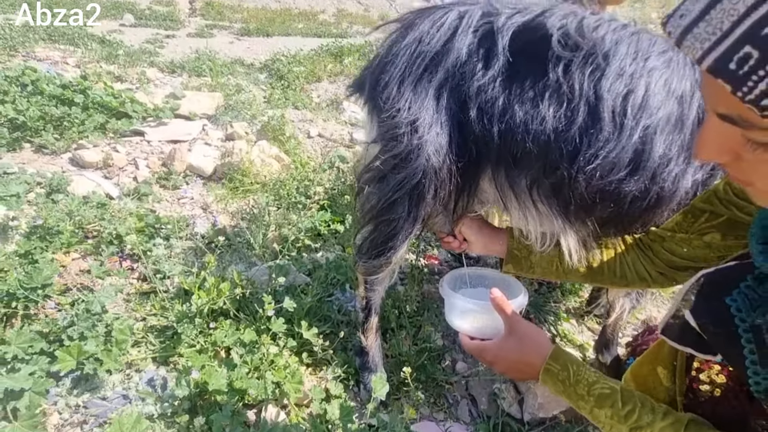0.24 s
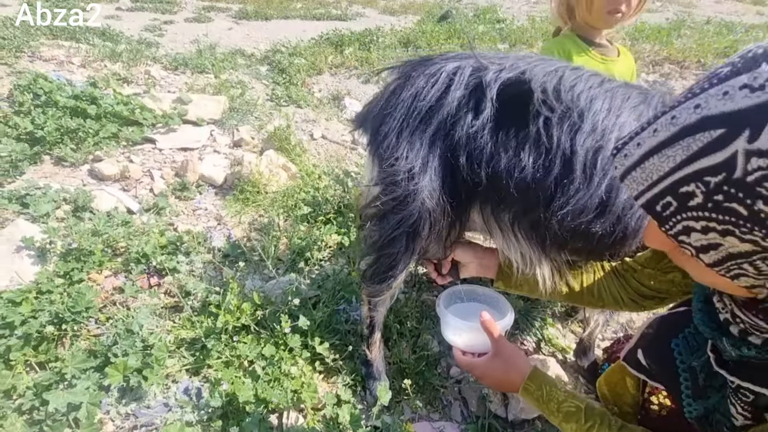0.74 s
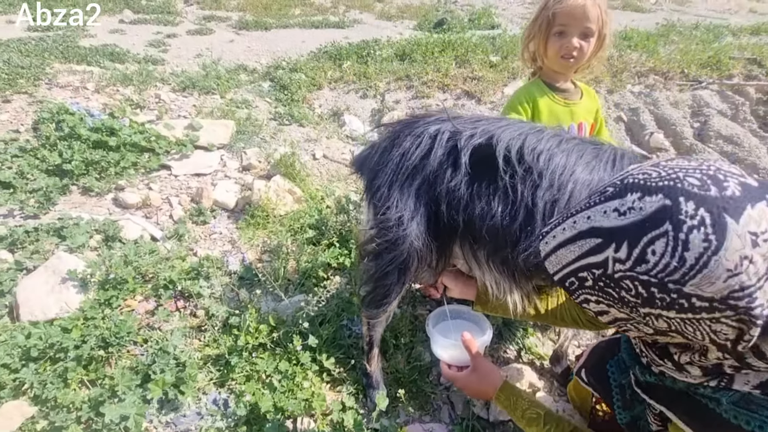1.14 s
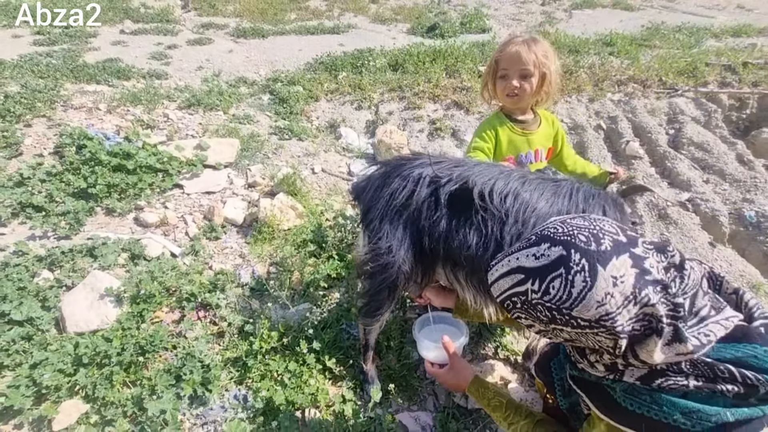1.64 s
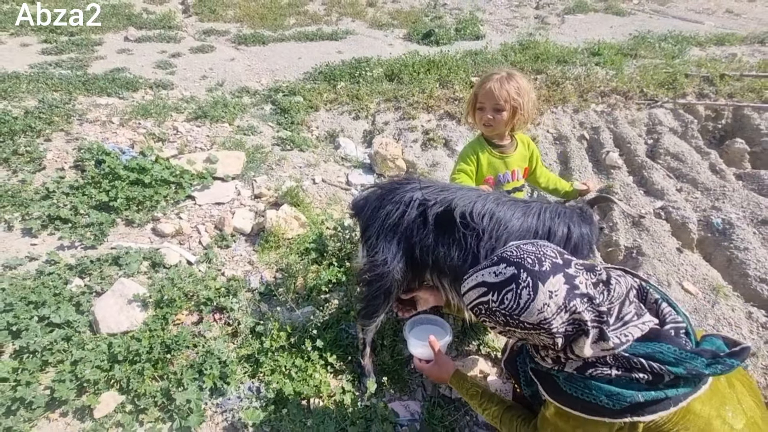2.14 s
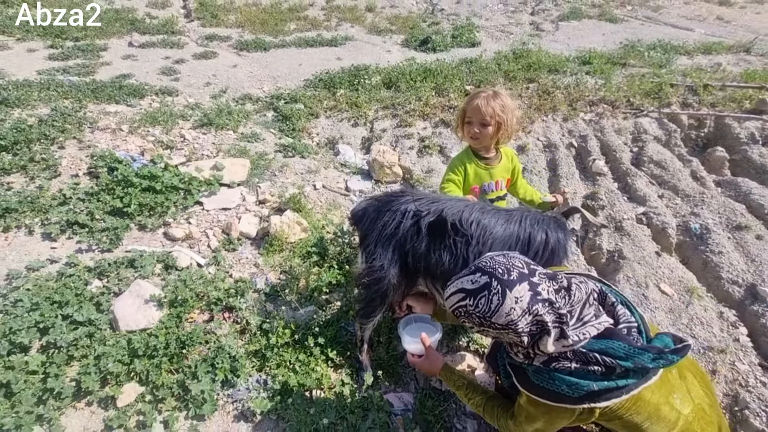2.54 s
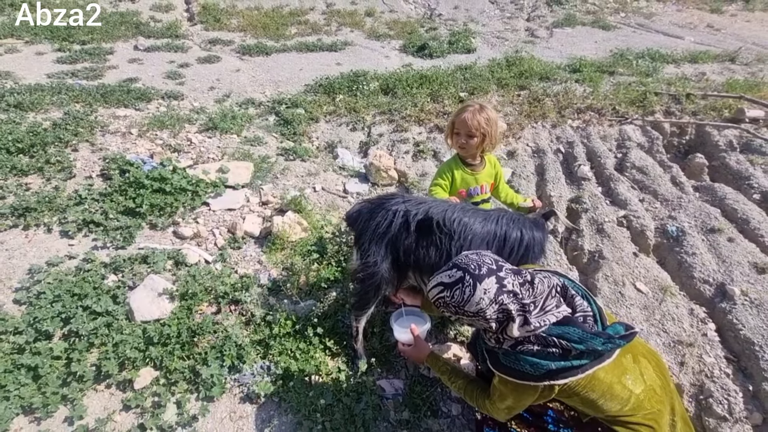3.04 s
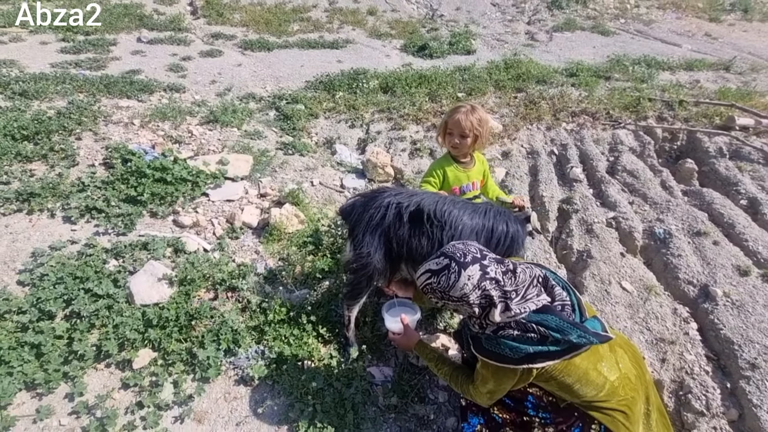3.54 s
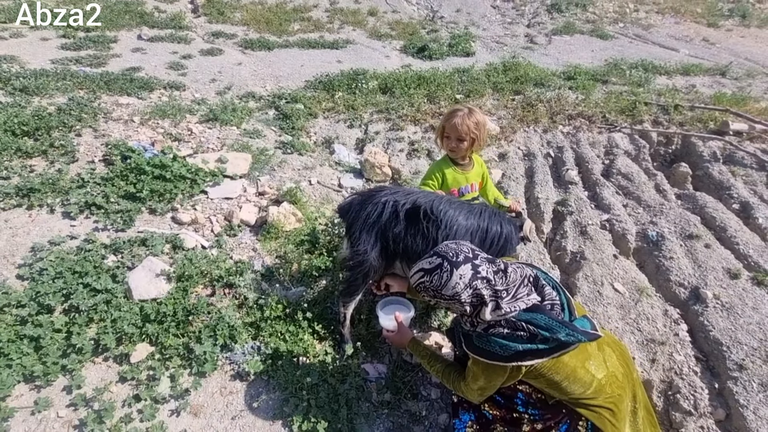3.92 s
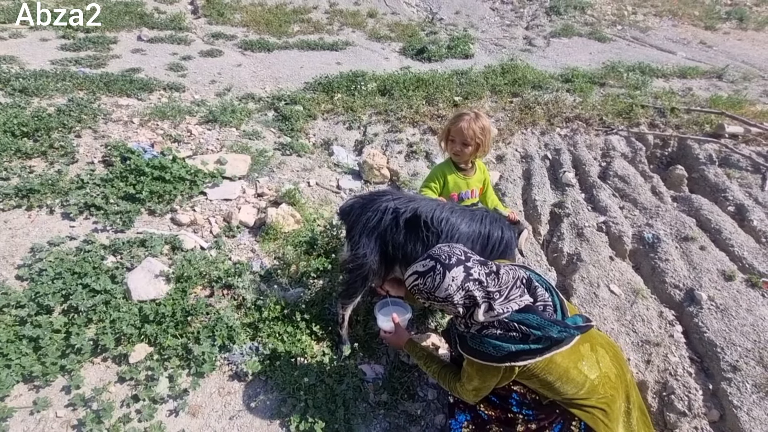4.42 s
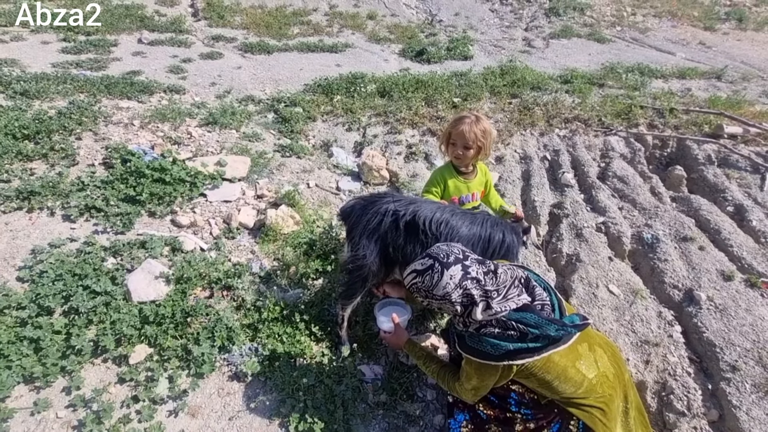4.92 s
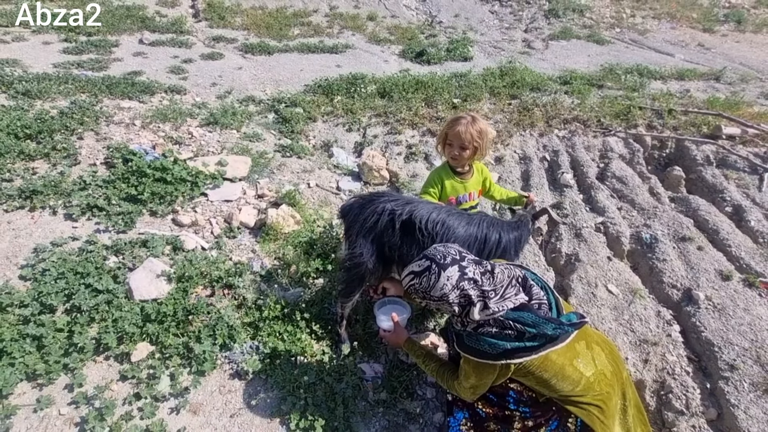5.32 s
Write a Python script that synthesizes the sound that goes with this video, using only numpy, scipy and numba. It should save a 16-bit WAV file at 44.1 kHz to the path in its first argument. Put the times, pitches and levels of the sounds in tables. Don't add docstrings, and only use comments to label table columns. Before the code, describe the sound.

Hand-milking in an open field: bright, grainy sprays of milk into a plastic bowl, low wind thumps, sparse bird chirps, a faint engine drone.

```python
import sys
import numpy as np
from scipy import signal
from scipy.fft import rfft, irfft
from scipy.io import wavfile
from numba import njit

SR = 44100
rng = np.random.default_rng(int(sys.argv[2]) if len(sys.argv) > 2 else 0)


def undo_db(level):
    steps = np.asarray(level, float) / 20
    return 10 ** steps


def transcribe(signal):
    frames = np.atleast_2d(signal).T
    limited = np.clip(frames, -1, 1)
    pcm = np.round(limited * 32767).astype(np.int16)
    wavfile.write(sys.argv[1], SR, pcm)


N = 245637
T = np.arange(N) / SR
EARS = np.array([[1], [-1]])


def rms_one(x):
    return x / np.sqrt(np.mean(x ** 2) + 1e-20)


def in_time(rows):
    s, *columns = np.transpose(rows)
    return [np.interp(T, s, c) for c in columns]


def colour(x, points):
    hz, db = np.transpose(points)
    f = np.maximum(np.fft.rfftfreq(N, 1 / SR), 1)
    gain = undo_db(np.interp(np.log(f), np.log(hz), db))
    return irfft(rfft(x) * gain, N)


def drift(rate_hz):
    r = np.exp(-2 * np.pi * rate_hz / SR)
    noise = rng.standard_normal(N + SR)
    return rms_one(signal.lfilter([1], [1, -2 * r, r * r], noise)[SR:])


@njit
def swept(x, twice_r_cos, r2):
    y = np.zeros_like(x)
    for c in range(x.shape[0]):
        for i in range(2, x.shape[1]):
            y[c, i] = x[c, i] - x[c, i - 2] + twice_r_cos[i] * y[c, i - 1] - r2 * y[c, i - 2]
    return y


def resonate(x, hz, width_hz):
    r = np.exp(-np.pi * width_hz * 1.5 / SR)
    k = 2 * r * np.cos(2 * np.pi * np.minimum(hz + 0 * T, 17000) / SR)
    return rms_one(swept(swept(x, k, r * r), k, r * r))


def notch(x, hz, width_hz, depth):
    r = np.exp(-np.pi * width_hz / SR)
    ring = swept(x, 2 * r * np.cos(2 * np.pi * (hz + 0 * T) / SR), r * r)
    return x - np.clip(depth, 0, 1) * (1 - r * r) / 2 * ring


def band_noise(noise, order, low_hz, high_hz):
    return signal.sosfilt(signal.butter(order, [low_hz, high_hz], "band", fs=SR, output="sos"), noise)


def add(out, s, burst):
    i = max(int(s * SR), 0)
    out[..., i:i + burst.shape[-1]] += burst[..., :N - i]


def motor():
    # pitch in Hz, level in dB
    lines = [(85, -57), (168, -68), (251, -82.5)]
    turns = np.cumsum(1 + 0.00617 * drift(0.73)) / SR
    return sum(undo_db(db + 3.5 + 2.8 * drift(3.6)) * np.sin(2 * np.pi * hz * turns) for hz, db in lines)


def field():
    # pitch in Hz, level in dB per Hz
    hiss = [(300, 2.5), (600, -9.5), (1000, -10), (1600, -9), (2400, -13), (3300, -10.5), (5000, -12.5),
            (5900, -12), (7600, -12.5), (9400, -21.5), (11500, -14), (13500, -6.5), (15000, -10.5),
            (16000, -4.5)]
    # pitch in Hz, left minus right in dB
    balance = [(400, -1), (5000, 10), (6800, -7.5), (8500, -19), (9600, -7), (15000, -5.5)]
    left, right = rms_one(colour(rng.standard_normal((2, N)), hiss))
    tilt = np.array(balance)
    both = np.array([colour(left, tilt * [1, .5]), colour(right, tilt * [1, -.5])])
    return both * undo_db(-67.5 + 2.3 * drift(54))


def eddies():
    # crest in seconds, peak in dB, pitch in Hz, grit in dB against the push
    puffs = [(2.26, -23, 75.5, -30), (0.393, -17, 118, -19), (0.603, -26.5, 88, -29),
             (0.722, -19.5, 104, -20), (0.864, -17.5, 79, -23), (1.027, -20.5, 86, -24),
             (1.242, -20.5, 82, -35), (1.4, -16.5, 99, -21), (1.489, -23, 122, -2.5),
             (1.532, -8, 81.4, -23), (4.551, -33, 67.4, -40), (1.636, -15, 123, -18.5),
             (1.807, -6, 70.6, -16.5), (1.853, -13.5, 81.6, -14), (2.003, -15.5, 100, -34),
             (3.013, -11.5, 89, -9), (3.09, -16, 76.5, -26.5), (4.103, -21, 78, -34), (3.41, -12, 101, -14),
             (3.569, -17, 87.5, -19), (3.657, -20, 72, -52), (3.761, -17, 103, -28),
             (3.839, -24.5, 87.3, -20.5), (4.022, -15.5, 98, -31), (4.174, -16.5, 79, -43),
             (4.808, -13, 90, -24.5), (5.264, -23, 60, -17), (5.435, -17, 53.7, -27.5),
             (5.492, -18, 73, -45), (5.528, -17.5, 98.5, -23)]
    # onset in seconds, peak in dB, pitch in Hz, grit in dB against the push
    lesser = [(0.029, -42, 80, -35), (0.073, -40, 80, -32), (0.118, -35, 80, -28),
              (0.162, -30.5, 76.5, -28), (0.191, -32, 80, -37), (0.221, -44, 79.4, -34),
              (0.526, -31, 83, -11), (0.558, -36, 83, -26), (0.597, -44, 82, -30), (0.648, -57, 80.4, -36),
              (0.696, -28, 88, -31), (0.963, -26, 85, -21.5), (1.087, -27.5, 77, -36),
              (1.169, -25, 75, -45), (2.046, -25, 80, -33.5), (2.216, -28, 80.5, -44),
              (2.655, -24, 85.5, -19), (2.771, -31, 85, -20), (3.05, -22, 85, -12.5),
              (3.151, -27.5, 77, -39), (3.206, -26, 78, -25), (3.384, -14.5, 82.4, -24.5),
              (3.72, -26, 81, -34), (3.789, -38, 80.6, -14), (3.928, -27, 80, -29), (4.048, -26.5, 83, -33),
              (4.248, -33, 82, -21), (4.515, -30.5, 76, -32), (4.67, -31, 76, -44), (5.163, -26.5, 75, -30)]
    veers = [.95, .98, 2.5, 2.75, 2.9, 3.3, 3.5, 4.13, 4.3]
    lag_s, lesser_db = 0.012, 3.5
    out, t = np.zeros((2, N)), np.arange(-SR // 20, SR // 10) / SR
    grit = rms_one(band_noise(rng.standard_normal(N + SR), 2, 110, 210))
    every = [*puffs, *[(s + lag_s, db + lesser_db, hz, grit_db) for s, db, hz, grit_db in lesser]]
    for (s, db, hz, grit_db), turn in zip(every, rng.random(99)):
        cycles = hz * t
        swell = np.exp(-(cycles / np.where(t < 0, .7, 1.1)) ** 2)
        front = np.exp(-((t + 0.0045) / 0.02) ** 2) * grit[int(s * SR):][:len(t)]
        push = swell * np.sin(2 * np.pi * (cycles - 0.18 * cycles * np.abs(cycles) + turn))
        port = 1 - np.searchsorted(veers, s) % 2
        add(out[port], s + t[0], undo_db(db) * (push + undo_db(grit_db - 3.0) * front))
    return out


def wind():
    # time in seconds, wind strength in dB, lean (left minus right) in dB
    breeze = [(0, -32.5, 3.5), (.25, -41, -6.5), (.7, -33.5, -6.5), (1.15, -41.5, -14.5), (1.45, -27, -6),
              (1.65, -34.5, 0), (1.9, -31.5, -9.5), (2.3, -39.5, -8.5), (2.55, -45.5, 12.5),
              (2.8, -35.5, -1), (3.2, -42.5, 5), (3.5, -28.5, -0.5), (3.8, -32.5, 15.5), (4.18, -40.5, 4),
              (4.4, -51, 3), (4.64, -43.5, 7), (4.9, -58.5, 14), (5.4, -37.5, 20)]
    # pitch in Hz, level in dB per Hz
    rumble_colour = [(12, -35), (20, 20), (45, 6.5), (73, 7), (91, 5.5), (198, -14), (398, -41), (552, -52),
                     (700, -59), (910, -94), (1540, -120)]
    strength_db, lean_db = in_time(breeze)
    level_db = strength_db + lean_db * EARS / 2
    lumps = undo_db(12.9 * np.minimum([drift(16.8), drift(10.1)], 0.7))
    rumble = rms_one(colour(rng.standard_normal((2, N)) * lumps, rumble_colour))
    both = eddies() + rumble * undo_db(level_db + 4.0)
    return signal.sosfilt(signal.butter(6, 40, "high", fs=SR, output="sos"), both)


def other_birds():
    # start in seconds, length in seconds, start pitch in Hz, end pitch in Hz, level in dB
    strays = [(0.561, 0.017, 2670, 2570, -67), (0.579, .012, 2550, 2550, -69),
              (2.206, .047, 3500, 2730, -69.5), (2.272, 0.013, 6500, 7700, -91),
              (2.288, 0.031, 7800, 6940, -80.5), (2.347, 0.0052, 3020, 3460, -70),
              (2.392, 0.0082, 3020, 3330, -63.5), (2.392, 0.0065, 5340, 3800, -69),
              (2.4, 0.01, 3400, 5400, -66), (3.878, 0.03, 6850, 6830, -84), (3.942, .012, 8000, 7400, -78),
              (4.055, 0.014, 6750, 6640, -80), (5.17, 0.012, 7500, 6700, -79),
              (5.268, 0.005, 3500, 5030, -78), (5.343, 0.029, 3260, 2930, -68.5),
              (5.407, .009, 3050, 2910, -66), (5.421, 0.024, 2550, 2350, -73)]
    # start in seconds, slide length in seconds, top pitch in Hz, level in dB
    falls = [
        (5.06, .016, 3370, -75.5),
        (5.18, .02, 3220, -72),
    ]
    rest_hz, rest_s, rest_db = 2810, 0.021, 4.5
    slides = [(s, length, hz, rest_hz, db) for s, length, hz, db in falls]
    rests = [(s + 0.83 * length, rest_s, rest_hz, .96 * rest_hz, db + rest_db) for s, length, hz, db in falls]
    return slides + rests + strays


def whistle(length, start_hz, end_hz, db):
    u = np.linspace(0, 1, int(length * SR) + 8)
    cycles = np.cumsum(start_hz + (end_hz - start_hz) * u) / SR
    return undo_db(db + 15.5) * np.sin(np.pi * u) ** 0.43 * np.sin(2 * np.pi * cycles)


def birds():
    # start in seconds, length in seconds, start pitch in Hz, end pitch in Hz, level in dB
    songs = [(0.433, 0.022, 4830, 5330, -67), (0.452, 0.026, 3960, 4580, -57),
             (.476, .009, 4280, 3800, -56), (.4885, .004, 5300, 4600, -61), (.494, 0.0057, 4200, 3770, -53),
             (.499, 0.0094, 3820, 3450, -68), (0.52, 0.023, 3430, 3610, -64.5),
             (0.55, 0.0075, 2970, 4200, -67), (3.902, .015, 4880, 5270, -73.5),
             (3.919, 0.022, 3810, 4420, -67), (3.937, 0.0041, 4530, 5050, -68),
             (3.94, .014, 4300, 3600, -61), (3.956, .005, 5300, 4300, -67), (3.965, 0.012, 3530, 3520, -74),
             (3.976, 0.0064, 5150, 4450, -68), (3.991, .01, 3350, 3400, -77),
             (3.999, .006, 3550, 4200, -59.5), (4.008, 0.01, 3670, 3000, -74),
             (5.362, 0.018, 4830, 5200, -72.5), (5.381, .02, 4300, 4240, -57.5),
             (5.396, 0.0049, 4350, 4970, -66), (5.4, 0.0095, 4280, 3700, -59.5),
             (5.4135, 0.0043, 5260, 4500, -69), (5.425, .008, 3500, 4100, -65),
             (5.433, .004, 5300, 4600, -70), (5.445, 0.018, 3530, 3590, -62.5),
             (5.4547, 0.0065, 3720, 4130, -55), (5.462, 0.0089, 3850, 3500, -64)]
    # start in seconds, length in seconds, start pitch in Hz, end pitch in Hz, level in dB
    chatter = [(2.162, 0.048, 4300, 3940, -88), (2.192, 0.065, 3530, 2820, -88),
               (2.345, 0.012, 2980, 5170, -80), (2.40, 0.055, 4830, 3570, -83),
               (3.745, 0.037, 4000, 4000, -79.5), (3.765, 0.051, 3590, 3420, -78.5),
               (3.895, 0.059, 7440, 6940, -81), (4.008, 0.048, 3250, 2770, -76),
               (4.03, 0.049, 3420, 3590, -77.5), (4.89, 0.071, 3630, 3680, -83.5),
               (4.895, .06, 4800, 4750, -86), (5.025, 0.037, 3650, 3460, -83.5),
               (5.145, 0.047, 3460, 3530, -82), (5.262, 0.046, 4430, 4980, -79),
               (5.26, 0.04, 3650, 4200, -84), (.55, 0.076, 3560, 3030, -76.5)]
    near, far, hoarse = np.zeros((3, N))
    for s, *note in chatter:
        add(hoarse, s, whistle(*note))
    for s, *note in other_birds():
        add(near if note[-1] > -61 else far, s, whistle(*note))
    for s, *note in songs:
        add(near, s, whistle(*note))
    near = near * undo_db(1.6 * drift(300))
    far = far * (0.75 + 0.35 * drift(200) + .15 * drift(600))
    far = far + 1.24 * hoarse * drift(266)
    t = T[:SR // 3]
    echoes = rng.standard_normal((2, len(t))) * undo_db(-60 * t / 0.36) * (t > .004)
    wet = undo_db(-41) * near + undo_db(-37) * far
    return (near + 0.63 * far) * undo_db(.5 * EARS) + signal.fftconvolve(wet[None], echoes, axes=1)[:, :N]


def ticks():
    # start in seconds, peak in dB, centre in Hz, left minus right in dB
    rustles = [(0.38, -59.5, 2600, 25), (0.655, -67, 2030, 8), (0.759, -47, 4100, 7),
               (0.7694, -40.5, 3400, 4), (0.815, -35.5, 3420, 6), (2.438, -50.5, 3560, -1),
               (2.507, -64, 3700, 11), (3.851, -49.5, 3750, 10), (5.127, -55, 2760, 1),
               (5.143, -54, 3370, 11), (2.525, -51.5, 3440, 0), (4.108, -46, 3300, 2), (.62, -58, 3980, -2)]
    out, t = np.zeros((2, N)), T[:SR // 20]
    for s, db, hz, pan_db in rustles:
        crackle = band_noise(rng.standard_normal((2, len(t))), 2, hz * 0.96, 9000)
        tick = undo_db(-60 * t / 0.012) * (np.sin(2 * np.pi * hz * t) + 0.84 * crackle)
        add(out, s, undo_db(db - 2.5 + pan_db * EARS / 2) * tick)
    return out


def drops():
    # start in seconds, peak in dB, ring in Hz
    knocks = [(0.816, -31, 820), (.828, -40, 940), (.835, -30, 870), (.844, -37, 800), (2.157, -50.5, 1250),
              (2.525, -44.5, 1050), (4.11, -35.5, 890), (4.944, -51.5, 1110), (5.127, -50, 980),
              (5.145, -57, 708)]
    out, t = np.zeros((2, N)), T[:SR // 20]
    for s, db, hz in knocks:
        knock = undo_db(-60 * t / 0.013) * np.minimum(t / 0.0018, 1) * np.sin(2 * np.pi * hz * t)
        add(out, s, undo_db(db) * knock * np.ones((2, 1)))
    return out


def spits():
    # start in seconds, peak in dB, ring in Hz
    snaps = [(0.177, -29, 7650), (1.186, -27.5, 13350), (1.216, -31, 12400), (1.315, -30, 12600),
             (1.352, -27, 12200), (1.4321, -28.5, 13000), (1.4581, -28, 13700), (1.513, -25.5, 13000),
             (3.6461, -50, 14500), (3.7494, -56, 7610), (3.7654, -51, 8160),
             (0.0593, -24.5, 12600), (0.195, -21.5, 12900), (1.2723, -32, 13800), (1.3033, -41, 13400),
               (1.5246, -30, 8140), (1.5507, -26, 7750), (1.6544, -30, 13500), (1.6644, -27.5, 7900),
               (1.7147, -30.5, 13600), (2.96, -34, 8140), (3.1694, -34, 14200), (3.364, -39, 6900),
               (4.2577, -47, 12800), (4.4727, -31.5, 14600)]
    out, t = np.zeros((2, N)), T[:SR // 50]
    for s, db, hz in snaps:
        noise = rng.standard_normal((2, len(t)))
        noise = noise[0] + .3 * noise
        crackle = band_noise(noise, 1, .8 * hz, min(1.15 * hz, 16000))
        add(out, s, undo_db(db + 0.5 - 4.1 * EARS) * undo_db(-60 * t / 0.013) * crackle)
    return out


def squeezes():
    # time in seconds, flow in dB, jet sharpness in dB
    squirts = [
        [(0, -46.5, 3.5), (.08, -42.5, -0.5), (.262, -44.5, -2.5), (.282, -52.5, -16), (.295, -61.5, -9),
         (.33, -68, 1.5)],
        [(.76, -77, 9.5), (.812, -78.5, 17), (.825, -53.5, -0.5), (.85, -50.5, -10.5), (.866, -58, 6),
         (1.06, -49, 2.5), (1.5, -48.5, 5), (1.75, -44.5, -4), (1.87, -48, -5)],
        [(2.47, -79, 2), (2.55, -62, -3), (2.63, -56, -4.5), (2.77, -56.5, 1.5), (2.92, -50, 0),
         (3.05, -50, -2), (3.4, -50, 0), (3.5, -53, -1), (3.59, -61, -6)],
        [(4.09, -73.5, -5.5), (4.22, -57.5, -10), (4.4, -55, 0.5), (4.48, -49, -3.5), (4.57, -52.5, -2),
         (4.68, -51, -9), (4.84, -60.5, -11.5)],
        [(5.38, -77.5, -12), (5.5, -56, -10.5), (5.56, -51.5, -10.5)],
    ]
    silence_db, start_s, release_db_per_s = -101.5, 0.068, 292
    dull_s, dull_db = .04, -7
    rows, late_db = [], np.zeros(N)
    for squirt in squirts:
        (start, _, first), (end, end_db, last) = squirt[0], squirt[-1]
        rows += [(start - start_s, silence_db, first), *squirt]
        rows.append((end + dull_s, end_db - release_db_per_s * dull_s, last + dull_db))
        rows.append((end + (end_db - silence_db) / release_db_per_s, silence_db, last))
    for squirt in squirts[1:]:
        age = (T - squirt[0][0]) / .27
        late_db += -14 * np.clip(1 - age ** 2, 0, 1) * (age > -.5)
    return *in_time(rows), late_db


def common_gaps(jet, wall_hz):
    # time in seconds, pitch in Hz, depth 0-1
    gap = [(.1, 5300, .8), (.2, 5200, .8), (.23, 4900, 1), (.27, 4900, .6), (.82, 4700, .8), (.85, 4750, 1),
           (.885, 4750, .55), (.93, 4800, 1), (.975, 4750, .5), (1.02, 4700, 1), (1.1, 5400, 1),
           (1.3, 5900, 1), (1.8, 6000, 1), (1.9, 6000, .5), (2.5, 5700, .5), (2.68, 5800, .75),
           (3.0, 6100, .65), (3.5, 6100, .5), (3.7, 6100, .4), (4.15, 5600, .95), (4.3, 5900, .7),
           (4.4, 6200, .9), (4.47, 6000, .5), (4.56, 5900, .95), (4.7, 5800, .7)]
    # time in seconds, depth 0-1
    upper_gap = [(1.0, .8), (1.1, .5), (1.22, 1), (1.45, 1), (1.55, .55), (5.5, .5)]
    # time in seconds, depth 0-1
    low_gap = [(0, .2), (.3, .5), (.85, .7), (1.2, .85), (1.45, 1), (1.75, .95), (1.9, .7), (2.6, .9),
               (2.97, .95), (3.05, .4), (3.3, .7), (3.6, .7), (4.2, .4), (4.6, .4), (4.8, .8)]
    wobble, spread_hz = .025, 200
    alike = jet.mean(axis=0, keepdims=True)
    gap_hz, depth = in_time(gap)
    gap_hz = gap_hz * (1 + wobble * drift(9.0))
    depth = depth * np.clip(1.05 + .25 * drift(18), .5, 1)
    left_over = notch(alike, gap_hz - spread_hz, width_hz=1200, depth=depth)
    left_over = notch(left_over, gap_hz + spread_hz, width_hz=1200, depth=depth)
    low_hz = 2630 + .6 * (wall_hz - 2000)
    left_over = notch(left_over, low_hz, width_hz=420, depth=in_time(low_gap)[0])
    upper_hz = 11100 * (1 + wobble * drift(8.0))
    left_over = notch(left_over, upper_hz, width_hz=1100, depth=in_time(upper_gap)[0])
    return jet - alike + left_over


def jets():
    # time in seconds, right port lead in samples, spray shadow (left minus right) in dB
    bearing = [(.1, 4.3, -5.5), (.9, 4.6, -1.5), (1.15, 5.1, -3), (1.35, 1.7, -5), (1.8, 1.44, 3),
               (2.6, 1.3, 4.5), (3.5, 0.45, 1.5), (4.5, 0.65, 8.5)]
    # time in seconds, air ring in Hz, wall ring in Hz, spray top in Hz
    rings = [(0, 1170, 1940, 12900), (.3, 1025, 1860, 12700), (.85, 970, 1700, 14300),
             (1.2, 1030, 2010, 13500), (1.5, 980, 2020, 13350), (1.9, 1010, 2020, 13150),
             (2.55, 1020, 1840, 13800), (3.0, 967, 2030, 13800), (3.3, 840, 2160, 14300),
             (3.6, 916, 2080, 14000), (4.15, 860, 1680, 13600), (4.5, 984, 2110, 13400),
             (5.57, 855, 1430, 13900)]
    # time in seconds, low splash in Hz, high splash in Hz, mist in Hz
    slides = [(0, 3080, 4630, 7650), (.82, 3140, 3960, 7800), (1.0, 3320, 4170, 7730),
              (1.11, 3160, 4440, 7630), (1.3, 3700, 4860, 7480), (1.55, 3720, 4860, 8070),
              (1.9, 3600, 5230, 8070), (2.6, 3450, 4350, 7500), (2.8, 3570, 4700, 8050),
              (3.25, 3800, 5000, 8430), (3.45, 3300, 4860, 7030), (4.2, 3040, 4430, 7630),
              (4.5, 3380, 4680, 8100), (5.5, 3060, 4400, 7000)]
    # time in seconds, level in dB
    wall_share = [(0, 3), (.3, -2), (.85, 0), (1.1, 1), (1.5, -0.5), (1.9, -2), (2.6, 6), (2.9, 1),
                  (3.15, 2), (3.6, -2.5), (4.15, 8.5), (4.37, 1), (4.6, -4), (4.85, 1.5), (5.5, 0.5)]
    # time in seconds, level in dB
    rim_share = [(0, 7), (.3, -0.5), (.85, 4.5), (1.4, 1), (1.9, 1), (2.6, 6), (2.95, -9), (3.1, 4.5),
                 (3.3, 1.5), (3.6, 1), (4.15, 7), (4.5, -6), (4.85, 1.5), (5.5, 0)]
    # width in Hz, level in dB, left minus right in dB, left-right likeness 0-1
    air_ring = (240, 0.048, 2.25, 1.18)
    wall_ring = (356, 1.6, 1.4, 0.96)
    splashes = [
        (910, 0, 2.5, 0.59),
        (770, -5.5, 1.5, 0.63),
    ]
    mist = (600, -6.5, -12, 0.6)
    spray_top = (1152, -1, -4, 0.3)
    # pitch in Hz, width in Hz, level in dB, left minus right in dB, likeness 0-1
    bowl_base = (662, 213, -6.5, 1, 1)
    rim = (1518, 309, -4.5, 6, 0.03)
    spray_modes = [
        (6850, 2980, -1.5, -2.5, 0.95),
        (10020, 1160, -11.5, -6, 0.92),
        (11200, 2000, -22, -29, 0.88),
    ]
    port_ring = (8065, 817, -11.5, -13, 0)
    fizz = (15487, 708, -4, -27, -0.5)

    air_db, spray_db, late_db = squeezes()
    wall_db = -1.5 + 0.29 * spray_db + late_db + in_time(wall_share)[0]
    splash_db = -2.5 + 0.59 * spray_db + 0.18 * (air_db.max() - air_db)
    rim_db = late_db + in_time(rim_share)[0] - 2.5
    air_hz, wall_hz, top_hz = in_time(rings)
    low_hz, high_hz, mist_hz = in_time(slides)
    lag, shadow_db = in_time(bearing)
    port_db = .4 * shadow_db
    fizz_db = -26 + 3.6 * np.minimum(np.abs(shadow_db), 6)

    sputter = 1.0 * drift(12.0) + 1.8 * drift(100) + 2.23 * drift(550)
    big_drops = undo_db(4.3 * np.minimum(rng.exponential(1, N), 3.5)) * (rng.random(N) < 300 / SR)
    direct = rng.standard_normal(N) * (1 + .5 * big_drops)
    scattered = rng.standard_normal((2, N)) * (1 + 0.97 * big_drops)
    fine = signal.resample_poly(direct, 8, 1)

    def shifted(samples):
        return fine[np.clip(8 * (np.arange(N) + samples), 0, 8 * N - 1).astype(int)]
    late = shifted(lag)
    beside = shifted(.4 * lag)

    def band(hz, width_hz, db, pan_db, alike, grain=0.97, right=late):
        share = np.clip(alike, 0, 1)
        struck = np.sqrt(share) * np.array([direct, right]) + np.sqrt(1 - share) * scattered
        x = resonate(struck, hz, width_hz)
        return x * undo_db(db + pan_db * EARS / 2 + grain * sputter + 1.8 * drift(41))

    air = band(air_hz, *air_ring, grain=0.048, right=beside)
    air = air - band(*bowl_base, grain=0.84, right=beside) * undo_db(0.096 * late_db)
    air = air - band(*rim, grain=0.3) * undo_db(rim_db)
    wall = band(wall_hz, *wall_ring, grain=0.12, right=beside)
    splash = band(low_hz, *splashes[0], grain=0.028, right=beside) - band(high_hz, *splashes[1], grain=1.0)
    top = sum(band(*mode) for mode in spray_modes[1:])
    top = top - band(top_hz, *spray_top, right=direct) + band(*fizz) * undo_db(fizz_db)
    top = top * undo_db(shadow_db * EARS / 2 + 0.46 * np.minimum(spray_db + 7.0, 0))
    spray = top - band(*port_ring, right=direct) * undo_db(port_db)
    spray = spray + band(*spray_modes[0]) - band(mist_hz, *mist, right=direct)
    jet = undo_db(air_db) * (air + undo_db(wall_db) * wall + undo_db(splash_db) * splash + undo_db(spray_db) * spray)
    jet[:1] = notch(jet[:1], 8600 * (1 + .03 * drift(6.0)), width_hz=700, depth=.6)
    return common_gaps(jet, wall_hz)


def scene():
    return motor() + field() + wind() + birds() + ticks() + drops() + spits() + jets()


def band_limit(x):
    return signal.sosfilt(signal.butter(12, 16400, fs=SR, output="sos"), x)


def record(dry):
    cut = irfft(rfft(dry) * (np.fft.rfftfreq(N, 1 / SR) < 15830), N)
    return band_limit(cut)


dry = scene()
out = record(dry)
transcribe(out)
```